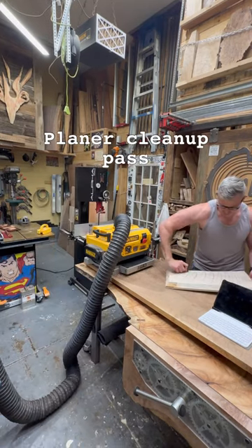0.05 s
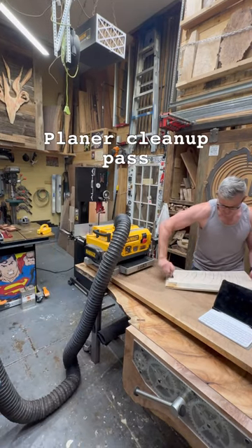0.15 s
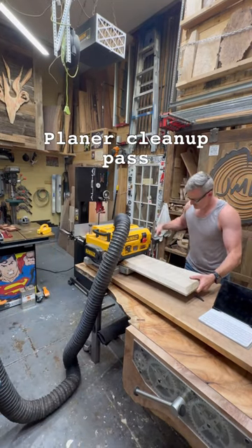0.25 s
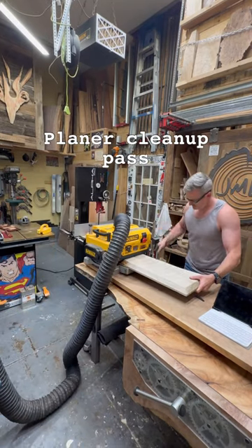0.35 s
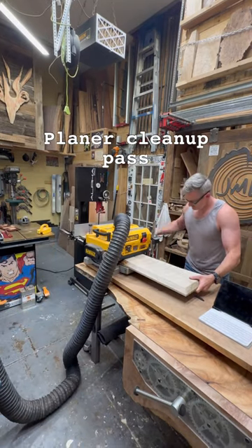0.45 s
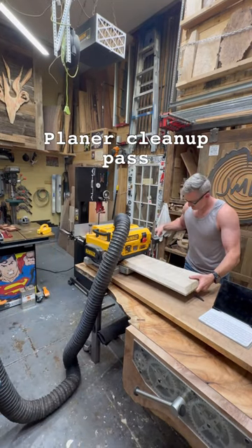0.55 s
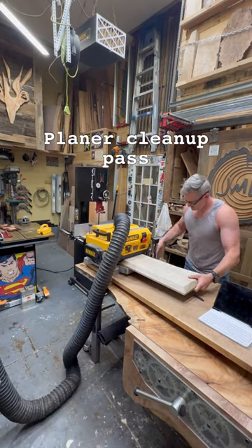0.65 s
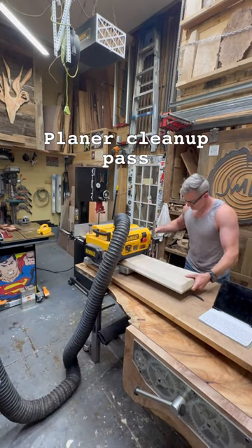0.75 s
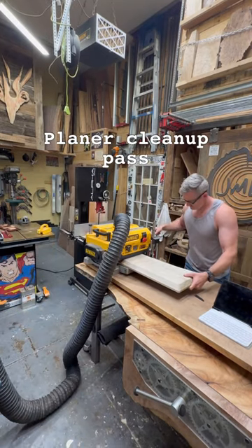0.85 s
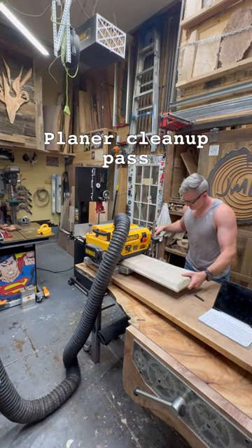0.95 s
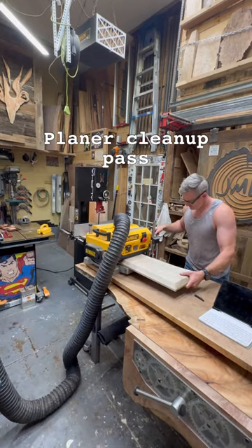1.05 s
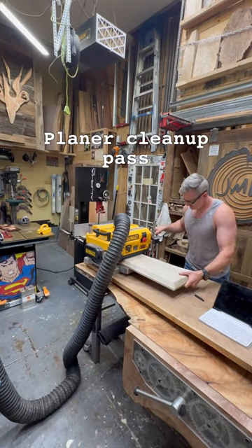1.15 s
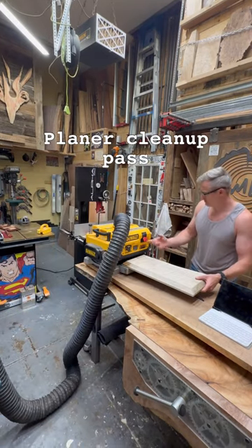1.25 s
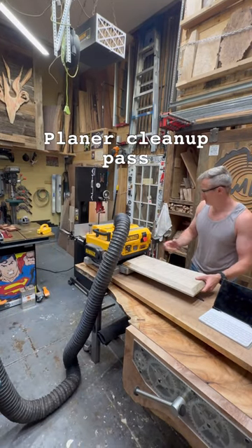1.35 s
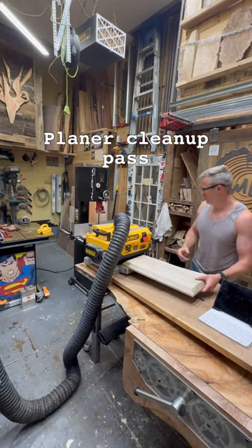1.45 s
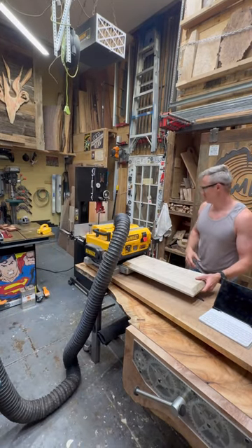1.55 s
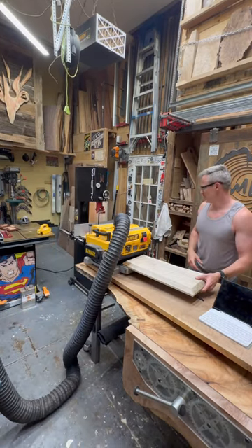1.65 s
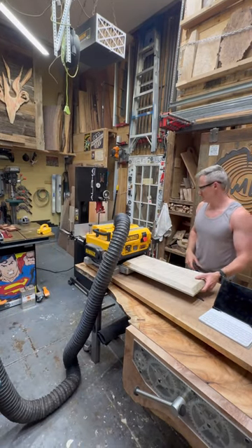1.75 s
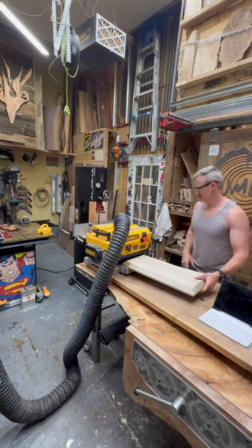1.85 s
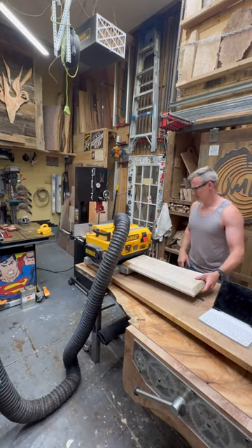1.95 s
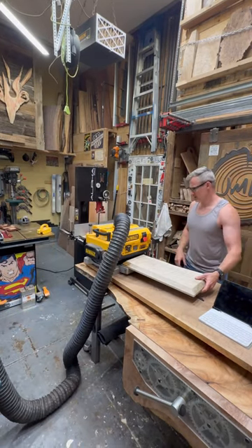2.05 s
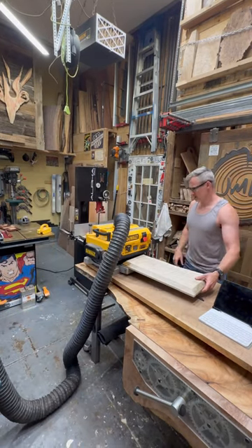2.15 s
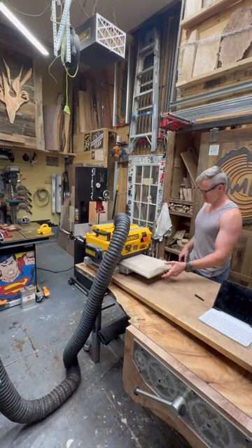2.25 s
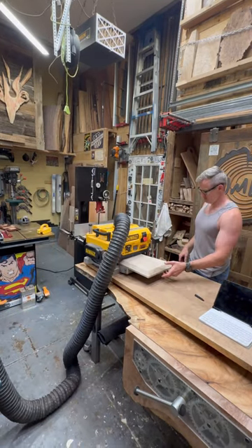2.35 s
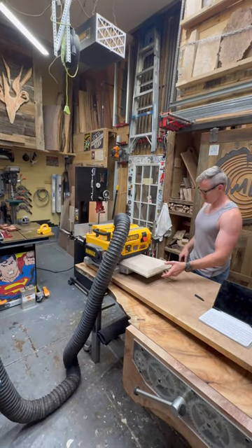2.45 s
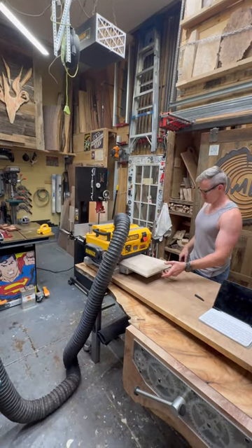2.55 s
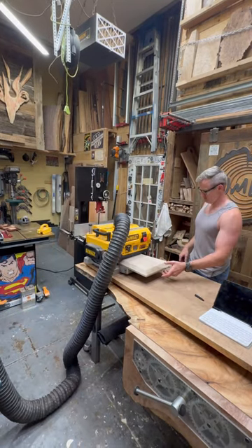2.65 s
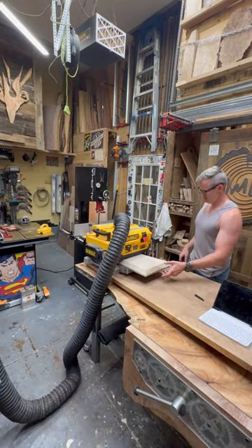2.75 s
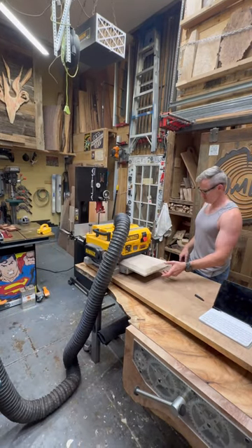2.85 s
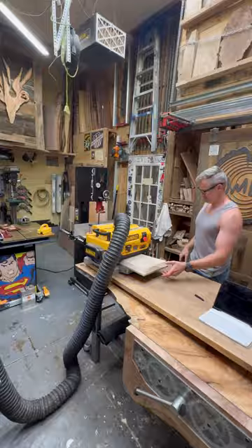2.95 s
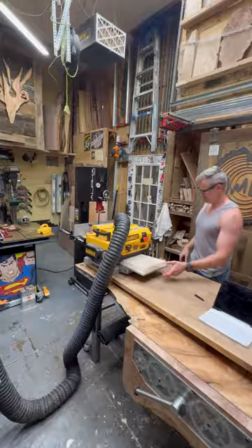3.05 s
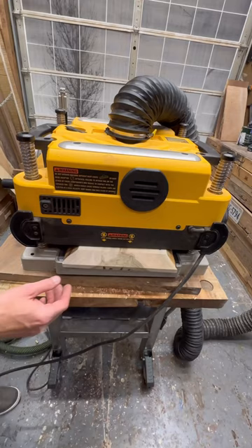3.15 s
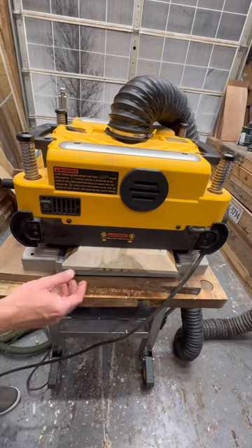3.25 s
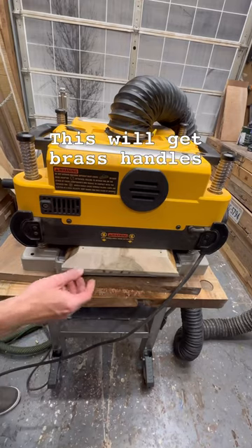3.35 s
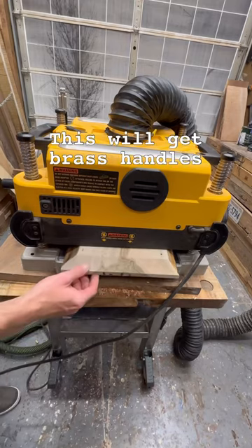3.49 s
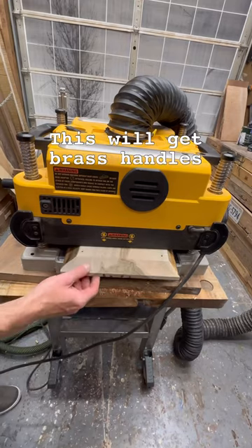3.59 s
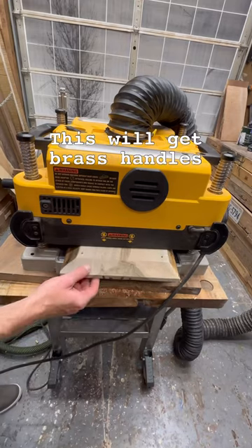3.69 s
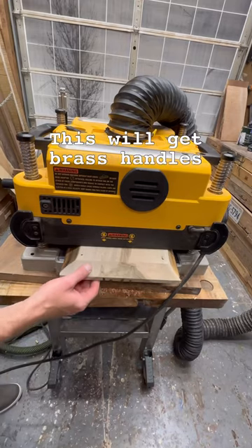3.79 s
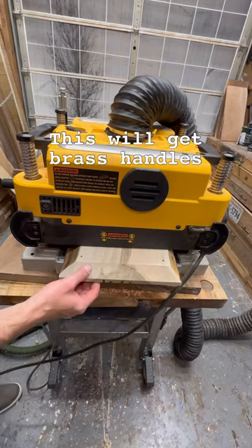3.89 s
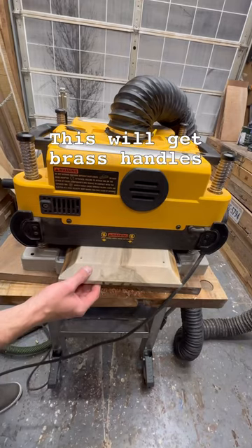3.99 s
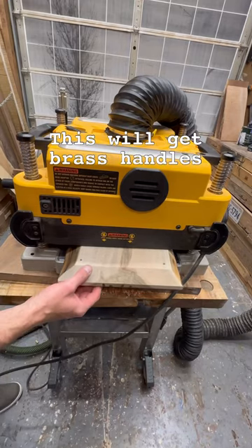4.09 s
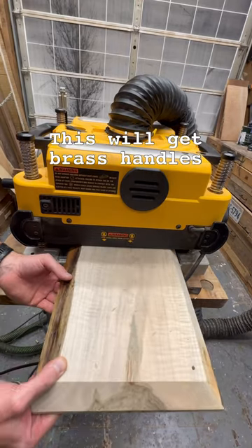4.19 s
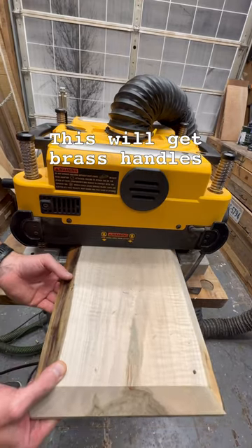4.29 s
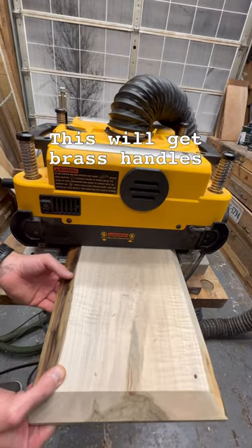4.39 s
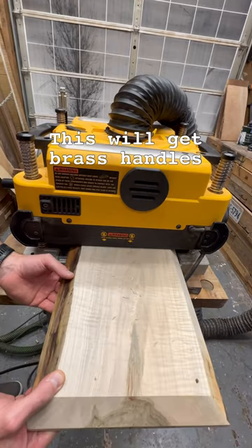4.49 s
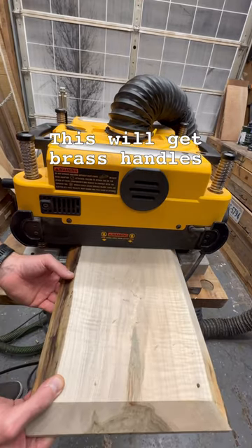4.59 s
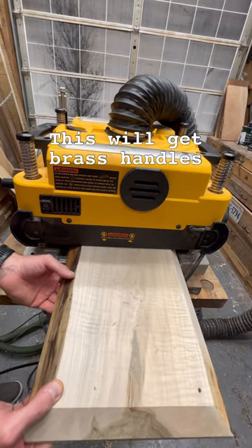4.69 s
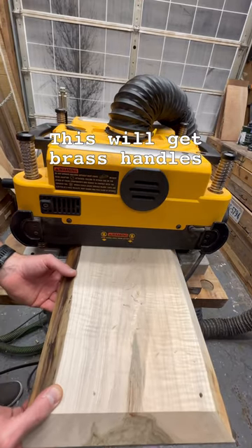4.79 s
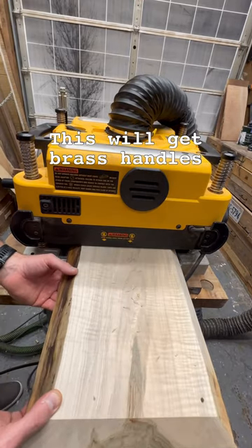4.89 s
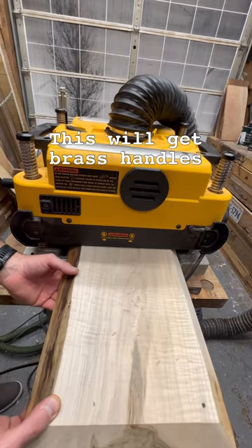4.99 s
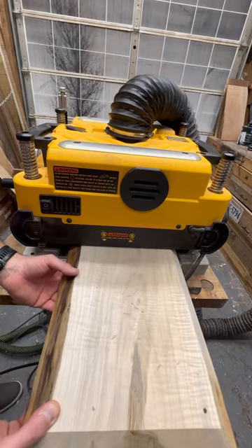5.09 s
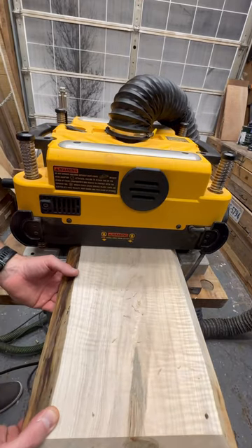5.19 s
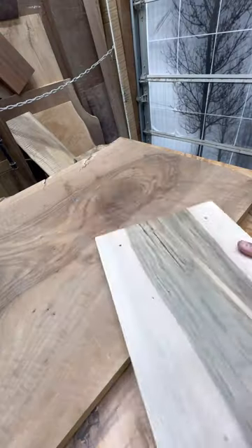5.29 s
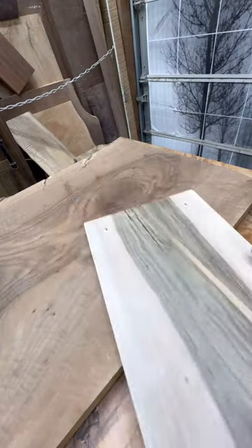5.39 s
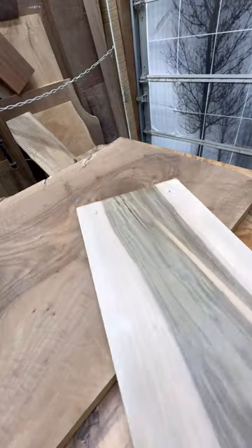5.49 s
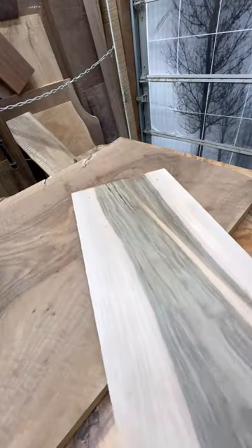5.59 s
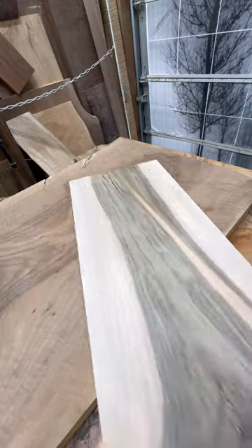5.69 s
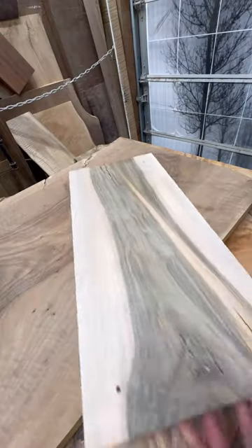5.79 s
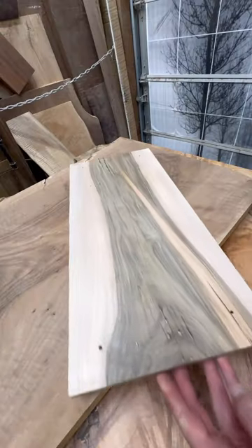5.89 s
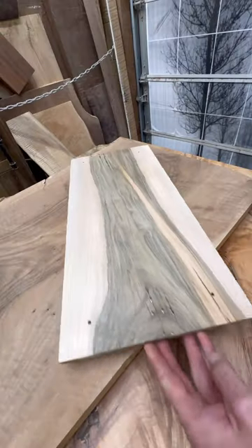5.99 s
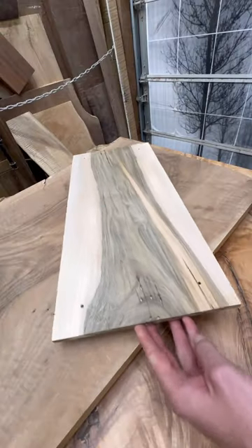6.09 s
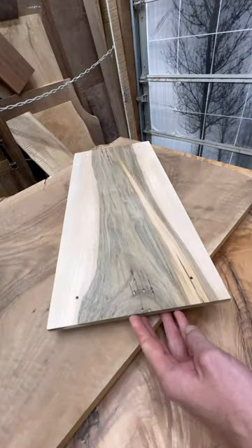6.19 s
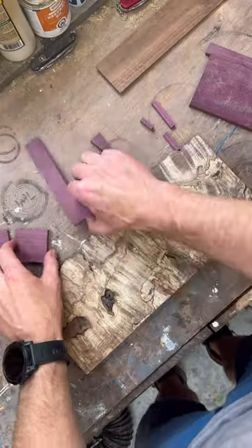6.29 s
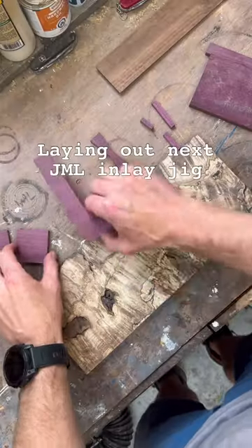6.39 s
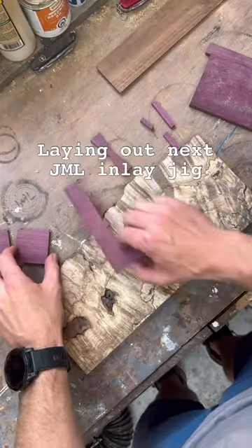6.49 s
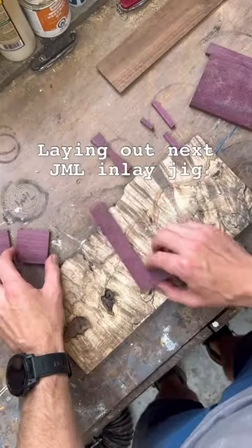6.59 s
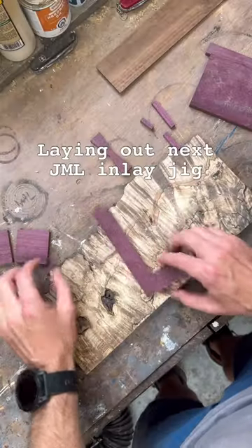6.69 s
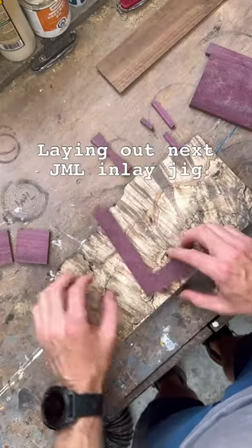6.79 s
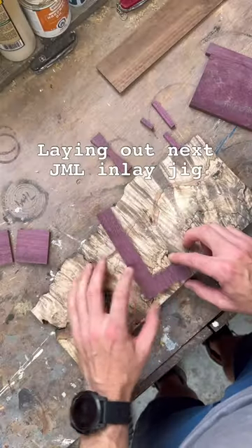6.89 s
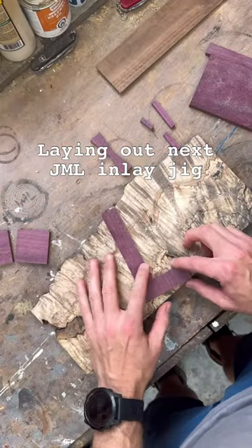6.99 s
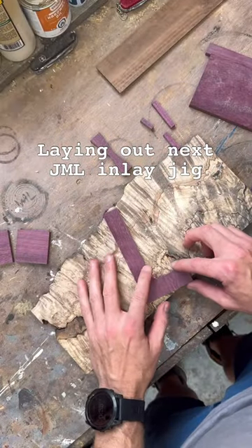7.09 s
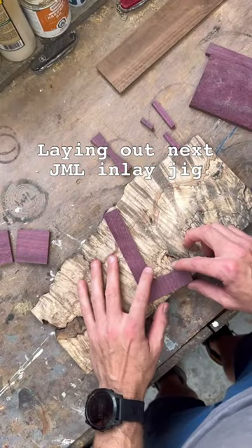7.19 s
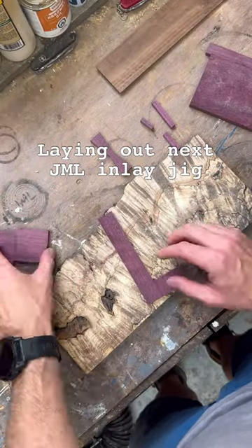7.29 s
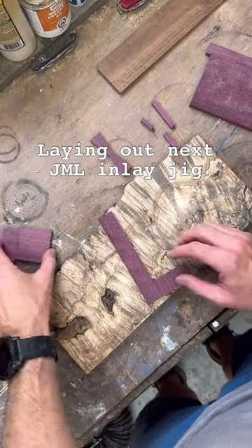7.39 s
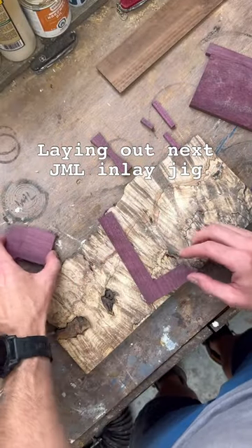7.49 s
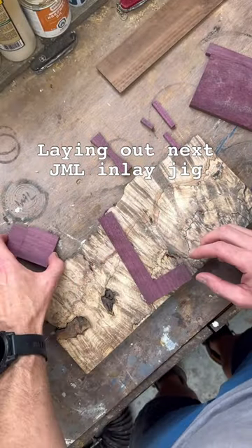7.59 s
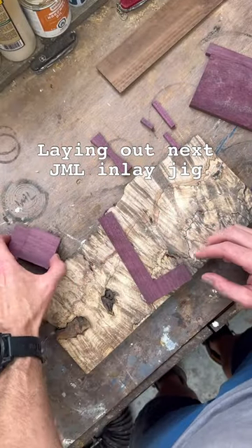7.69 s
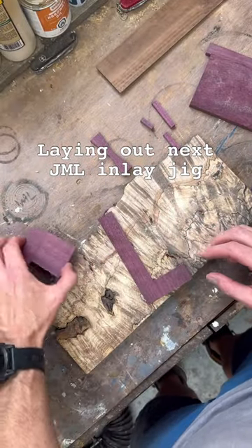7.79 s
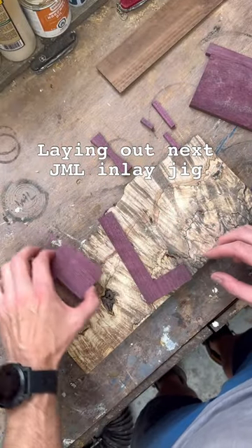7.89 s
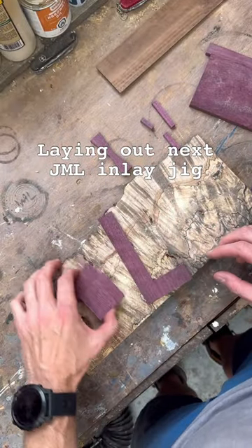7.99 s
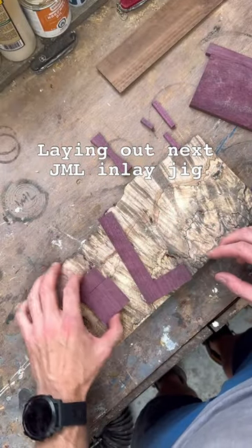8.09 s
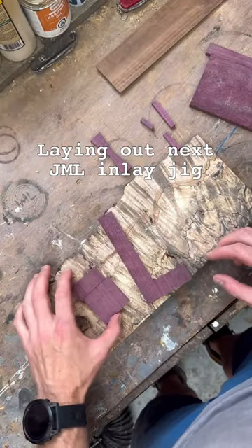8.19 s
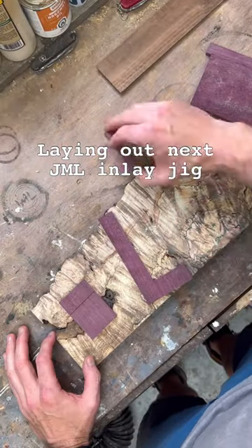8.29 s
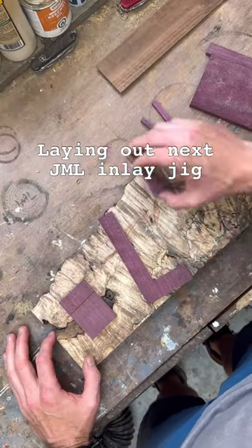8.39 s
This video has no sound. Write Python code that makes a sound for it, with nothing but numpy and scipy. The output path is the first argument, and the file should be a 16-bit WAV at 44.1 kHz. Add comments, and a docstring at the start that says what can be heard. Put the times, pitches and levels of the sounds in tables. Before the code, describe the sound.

A dust collector drones, a wood planer whines up and planes loudly, then a board knocks down and small wooden pieces tap quietly.

```python
"""A garage workshop, in stereo and in quick cuts. A dust collector drones on its fan blades. A benchtop
planer is switched on, spins up and takes a board, its tones riding on the motor speed over rushing noise:
the microphone is first across the shop, then close up. The board is dropped and slid over a slab. Last,
in the quiet, small hardwood pieces are shuffled and set down on a bench. Every blow rings the modes of
the thing struck, and the garage answers."""
import sys
import numpy as np
from scipy import signal
from scipy.io import wavfile
from scipy.ndimage import uniform_filter1d

SR = 44100
rng = np.random.default_rng(int(sys.argv[2]) if len(sys.argv) > 2 else 0)


def unload_wav(signal):
    """Save mono or channel-first audio to the path in sys.argv[1] as 16-bit WAV at rate SR, clipped to [-1, 1]."""
    wavfile.write(
        sys.argv[1],
        SR,
        np.round(np.clip(np.atleast_2d(signal).T, -1, 1) * 32767).astype(np.int16),
    )


N = 372644

# Planer, one entry a stage: spin-up and cut from across the shop, then cut and outfeed close up.
# motor speed: (t/s, f/Hz)
MOTOR_SPEED = [
    [(1.3, 95.15), (1.41, 166.3), (1.5, 215.2), (1.6, 248), (1.72, 264.9), (1.9, 285.4), (2.05, 294.3),
     (2.238, 302.2)],
    [(2.242, 276.5), (2.42, 284.9), (2.55, 293.9), (2.7, 297.5), (2.95, 297.5), (3.187, 292)],
    [(3.19, 296.9), (3.7, 296.5), (4.185, 295.5)],
    [(4.19, 293), (4.42, 295.6), (4.6, 301.2), (4.85, 303.6), (5.236, 305.5)],
]
# tone families under speed and load: (t/s, motor/dB, cutter/dB, whine/dB, whistle/dB)
FAMILY_LEVELS = [
    [(1.3, -57.5, -23, -73, -44), (1.405, -43, -38, -56, -42.5), (1.467, -31, -44, -40, -32),
     (1.55, -36, -36, -41, -34), (1.72, -26, -26, -37, -40), (2.238, -21, -28.5, -42, -57.5)],
    [(2.242, -32, -35, -48, -59), (2.44, -24.5, -25, -48, -54), (2.52, -27, -29.5, -36, -54),
     (2.57, -27, -33, -43, -54), (2.67, -28, -24, -35.5, -59), (2.99, -26.5, -25.5, -41.5, -59),
     (3.187, -32, -32, -37, -57)],
    [(3.19, -49.5, -44, -44, -40), (3.95, -45, -45, -43, -40.5), (4.185, -45.5, -44.5, -64, -41)],
    [(4.19, -39, -41.5, -36, -38.5), (4.45, -42.5, -44, -37.5, -35.5), (4.6, -38.5, -44, -34.5, -42),
     (4.8, -38.5, -45, -30, -41), (5.236, -39, -43, -30.5, -51)],
]
# the tones rasp as the motor climbs, then steady: (waver/dB, jitter/share of speed)
RASP = [(4.2, .0085), (2.0, .001), (1.5, .0006), (1.5, .0008)]
# motor, cutter drive, fan whine, high whistle: (multiple of motor speed, level/dB re family)
FAR_FAMILIES = [(1, 0), (1.475, -10), (2, -9)], [(2.32, -12), (2.522, 0), (2.74, -13), (3.36, -14),
                (3.79, -17), (4.01, -18), (4.43, -18), (5.28, -19), (5.5, -19)], [(7.62, 0), (8, -1),
                (9.61, -7), (13.69, -7)], [(16, 0)]
NEAR_FAMILIES = [(1.258, 0), (1.68, -1), (2.29, -1), (2.45, -1), (2.684, -4)], [(2.815, 3), (3.162, -2),
                 (3.361, -2), (4.215, -5), (4.4, -3), (4.924, -3), (5.61, -6), (6.722, 3), (9.12, -6),
                 (9.683, 0.5), (10.665, -7), (13.04, -7), (13.83, -5)], [(8, 0)], [(17.63, 0)]
# cutter head buzz: (turns per motor turn, level/dB re cutter family)
FAR_BUZZ, NEAR_BUZZ = (.504, -25), (0.6, -26)

# stereo width across the shop, close up and at the bench: (f/Hz, side level/dB)
WIDE_FAR = [(60, -26), (200, -27), (380, -11), (700, 3.5), (1300, -6), (2400, -3.5), (4400, -1.5),
            (9000, 1), (15800, -5.5)]
WIDE_NEAR = [(40, 10), (750, -2), (1300, -6), (1800, -29), (3600, -17.5), (5200, -4.5), (10000, 0.5),
             (15800, -8.5)]
WIDE_BENCH = [(40, -28), (300, -1), (1500, -6), (4000, -1), (7000, 1.5), (15800, -3.5)]
# treble notch in the middle of the stereo image: (f/Hz, mid level/dB)
MID_TREBLE = [(10000, 2.5), (11000, -14.5), (11800, -67), (14200, -67.5), (15000, -8.5), (15800, -12)]
# rushing and rubbing noises: curve (t/s, level/dB), colour (f/Hz, level/dB), width
SPIN_UP = [(1.25, -32.5), (1.57, -18.5), (1.986, -15.5), (2.226, -19.5), (2.238, -23.5)], [(60, -26),
           (175, -15.5), (260, 3), (490, -4.5), (700, 2), (900, 1), (1500, -3.5), (3000, -10.5),
           (4000, -7.5), (5000, -16.5), (6500, -10.5), (10000, -19.5)], WIDE_FAR
CUT_FAR = [(2.24, -25), (3.166, -24), (3.187, -24)], [(40, -49), (90, -29.5), (216, -15.5), (300, -9),
           (540, -8), (750, -6.5), (1250, -12), (3000, -17.5), (4000, -16), (5000, -23), (6500, -18),
           (10000, -27)], WIDE_FAR
CUT_NEAR = [(3.189, -28), (4.187, -27.5)], [(25, -28), (53, -5.5), (153, -6.5), (362, -3.5), (813, -1.5),
            (1120, -4), (1700, -2), (2210, -7), (4110, -4.5), (4900, -14), (5600, -9.5), (7500, -11.5),
            (10000, -12.5)], WIDE_NEAR
OUTFEED = [(4.187, -26.5), (4.4, -24.5), (5.236, -24)], [(25, -29), (59, -5), (153, -8.5), (372, 0.5),
           (835, -1.5), (1150, -9), (1850, 0), (2390, -7), (4110, -5), (4900, -14), (5600, -8.5),
           (7500, -12), (10000, -12)], WIDE_NEAR
BOARD_SLIDE = [(5.237, -39), (5.36, -40.5), (5.5, -41.5), (5.53, -38.5), (5.65, -39.5), (6.14, -48),
               (6.223, -53.5), (6.25, -64)], [(30, -12), (75, 0), (153, -18), (300, -6.5), (550, -3.5),
               (1300, -5.5), (2010, -9), (2100, 0), (2200, -12.5), (3300, -14), (4990, -25), (6600, -21),
               (10000, -28)], WIDE_BENCH
SHOP_AIR = [(0, -34), (2.238, -35), (2.242, -45), (3.187, -40)], [(25, -17), (60, 0), (235, 4), (500, 2),
            (900, -6), (1500, -15.5), (3000, -21.5), (4000, -16), (5000, -24.5), (7000, -23),
            (10000, -31.5)], WIDE_FAR
ROOM_TONE = [(6.2, -60.5), (8.45, -65)], [(30, -3.5), (64, 4.5), (169, -14), (435, -20), (1420, -19),
             (2520, -25), (3840, -21.5), (5120, -32), (7020, -23), (9130, -39.5), (13500, -48)], WIDE_BENCH
# the casing shakes as the motor gathers speed: (level/dB, hold/s, fade/s, fade/dB), colour, width
CASING_GROWL = (-22, 0.48, 0.5, -13.5), [(350, -40.5), (480, 5.5), (540, -7.5), (600, -5.5), (680, 3),
                (760, -4), (860, -8), (1100, -59.5)], WIDE_FAR
# board on the feed table, pieces on the bench: strokes (t/s, level/dB, fade/s), colour, width
FEED_SCRAPES = [(0.772, -45, 0.03), (0.795, -45, 0.058)], [(2000, -18), (3500, -4), (6000, -2), (8000, -3),
                (10500, -6)], WIDE_FAR
HARDWOOD_PIECE_SCUFFS = [(6.275, -58.5, 0.14), (6.865, -52.5, 0.083), (6.96, -55.5, 0.12),
                         (7.2, -60, 0.068)], [(150, -22), (350, 5), (500, 2), (700, -8), (1500, -17),
                         (9000, -39)], WIDE_BENCH
# the bench leaned on: crests (t/s, level/dB), colour, width
BENCH_RUMBLE = [(6.33, -48), (6.37, -45), (6.6, -40), (6.96, -54), (7.04, -49), (7.24, -46), (8.05, -45),
                (8.11, -46)], [(25, -24.5), (60, -12.5), (130, 6.5), (250, -10), (400, -36.5),
                (900, -71.5)], WIDE_BENCH

# blows: (t/s, peak level/dB, left minus right/dB, softness/ms)
SWITCH_CLICKS = [(1.2465, -13, 0.89, 0.021), (1.26, -11, 0.8, 0.33)]
BOARD_DROP = [(5.237, -16, 4, 0.055), (5.241, -8.5, -4, 0.15), (5.249, -12, -5, 0.3),
              (5.263, -13.5, 9.5, 0.13), (5.295, -23, -2, 0.13)]
STRIP_TAPS = [(6.277, -43, -12, 0.015), (6.575, -11.5, -14.5, 0.009), (6.5776, -17.5, 6, 0.044),
              (6.5828, -12.5, 3, 0.13), (6.6098, -19, 12, 0.022), (6.6382, -18, -12, 0.022)]
STEEL_CLINKS = [(7.2775, -14.5, -15.5, 0.0063), (7.2868, -17, 8, 0.01), (7.3034, -26, -9, 0.012)]
BLOCK_TAPS = [(8.0085, -18, -10.5, 0.016), (8.0148, -25.5, 6, 0.013), (8.117, -34, -4, 0.26)]
HAND_BUMPS = [(6.31, -43, -6, .6), (6.36, -44, 0, 0.62), (7.025, -44, -4, 0.59), (7.21, -41, -7, 0.8),
              (7.23, -37, -7, 0.7), (7.254, -38, -6, 1.1), (8.035, -37.5, -4, 0.42), (8.131, -32, -4, 0.55)]
SHOP_KNOCKS = [(0.017, -28, -4, 0.033), (0.144, -23, -1, 0.05), (0.156, -22.5, 1, 0.12),
               (0.21, -28.5, -1, 0.056), (0.49, -23.5, -4, 0.17), (0.779, -28, -4, 0.13)]
SHOP_TICKS = [(0.246, -29, 0, 0.01), (1.208, -33.5, 0, 0.0088)]
# modes of the things struck: (f/Hz, level/dB, t60/s)
CASING_MODES = [(242.5, -10, 0.16), (896, -14.5, .01), (1830, -13.5, 0.014), (2730, -13, 0.006),
                (3290, -13.5, 0.005), (6040, -14.5, 0.004)]
BOARD_MODES = [(151, -14, 0.34), (210, -11, 0.04), (377, 11.5, 0.026), (748, 11, 0.012), (873, 2, 0.067),
               (1330, 5, 0.018)]
STRIP_MODES = [(162, -13.5, 0.31), (312, -9, 0.17), (493, 2.5, 0.045), (843, 0, 0.038), (1310, 5, 0.0079),
               (1765, 4, 0.019), (2300, 3.5, 0.01), (3050, -0.5, 0.015), (3930, -1, 0.0052),
               (5250, -6, 0.017), (7000, -7.5, 0.0046), (11400, -30, .004)]
STEEL_MODES = [(294, -24, 0.035), (706, -20, 0.011), (1440, -17, 0.0046), (2620, -12, 0.0036),
               (4180, -9.5, 0.0071), (5230, -13, 0.0079), (6670, -3, 0.029), (8740, -9, 0.0066),
               (10460, -16, 0.0052), (12550, -6.5, 0.0085)]
BLOCK_MODES = [(520, -7.5, 0.059), (900, 1.5, 0.024), (1700, 10, 0.0042), (2440, 5.5, 0.012),
               (3300, 7, 0.005), (4400, 1, 0.0091), (5600, 3.5, 0.0023)]
BENCH_MODES = [(74, -10, 0.22), (134, 0.5, 0.14), (185, -20, 0.062), (253, -4, 0.091)]
SHOP_WOOD_MODES = [(1040, 1.5, 0.048), (1440, 0, 0.072), (1830, -2.5, 0.022), (2165, -8, 0.075),
                   (2580, -7, 0.025)]
TICK_MODES = [(2600, -2.5, .006), (4000, -2, .006), (6100, -3, .005), (8500, -4.5, .004), (12500, -4, .003)]

# the dust collector's blade tone: (t/s, level/dB)
BLADE_LEVEL = [(0.0, -22.5), (1.5, -22.5), (1.56, -17.5), (2.2, -27.5), (2.28, -31), (3.19, -31.5)]
# its shaft orders: (multiple of shaft speed, level/dB re blade tone)
BLOWER_ORDERS = [(1, -11), (2, -15), (3, -21), (5, -24), (6, 0), (8, -21), (9, -20), (12, -14), (18, -20.5)]
# reverberation of the garage: (f/Hz, t60/s)
GARAGE_DECAY = [(100, 0.7), (500, 0.4), (2000, 0.32), (6000, 0.4), (12000, 0.19)]


def planer_tones():
    """Four tone families and the cutter head's buzz ride on the motor speed, which sags under load."""
    out = np.zeros((2, N))
    positions = [(FAR_FAMILIES, FAR_BUZZ, .9)] * 2 + [(NEAR_FAMILIES, NEAR_BUZZ, .35)] * 2
    for speed, levels, position, rasp in zip(MOTOR_SPEED, FAMILY_LEVELS, positions, RASP):
        families, (head_ratio, buzz_db), spread_rad = position
        start, speed_hz = sample_curve(speed)
        t = start + np.arange(len(speed_hz)) / SR
        times, *levels_db = zip(*levels)
        gains = [gain_of(np.interp(t, times, db)) for db in levels_db]
        sound = sum(gain * shaft_tones(speed_hz, orders, *rasp, spread_rad)
                    for gain, orders in zip(gains, families))
        buzz_orders = [(k, buzz_db) for k in range(7, 21)]
        sound += gains[1] * shaft_tones(head_ratio * speed_hz, buzz_orders, 4.2, .0007, spread_rad)
        add(out, start, sound * edge_fades(len(t), 100))
    return out


def planer_rush():
    """The planer rushes as it spins up and cuts; its casing growls while the motor gathers speed."""
    growl, colour, width = CASING_GROWL
    casing = rush(stroke(1.329, .008, *growl), colour, width, patchy_db=2)
    return casing + sum(rush(*stage) for stage in (SPIN_UP, CUT_FAR, CUT_NEAR, OUTFEED))


def planer_switch():
    """The switch snaps and rings the casing, across the shop."""
    return blows(SWITCH_CLICKS, CASING_MODES, rattle_db=-12, rattle_s=.016, wet_db=-10.5)


def board():
    """The board scrapes onto the feed table; once planed, it is dropped and slid over the slab."""
    out = blows(BOARD_DROP, BOARD_MODES, rattle_db=-81, rattle_s=.03, wet_db=-8)
    scrapes, colour, width = FEED_SCRAPES
    for start, db, fade_s in scrapes:
        out += rush(stroke(start, .0066, db, 0, fade_s, -12), colour, width, patchy_db=0)
    return out + rush(*BOARD_SLIDE, patchy_db=1.5)


def small_pieces(fade_db_per_s=-46):
    """Fingers push pieces over the bench; a hardwood strip and a block are set down, and steel clinks."""
    out = blows(STRIP_TAPS, STRIP_MODES, rattle_db=-24, rattle_s=.014, wet_db=-8)
    out += blows(STEEL_CLINKS, STEEL_MODES, rattle_db=-12, rattle_s=.025, wet_db=-6)
    out += blows(BLOCK_TAPS, BLOCK_MODES, rattle_db=-13.5, rattle_s=.053, wet_db=-6)
    scuffs, colour, width = HARDWOOD_PIECE_SCUFFS
    for start, db, fade_s in scuffs:
        scuff = stroke(start, .022, db, 0, fade_s, fade_db_per_s * fade_s)
        out += rush(scuff, colour, width, patchy_db=3.5)
    return out


def bench(swell_s=.057, die_s=.12, range_db=16):
    """The bench top rings low when hands bump it and rumbles when leaned on."""
    out = blows(HAND_BUMPS, BENCH_MODES, rattle_db=-41.5, rattle_s=.034, wet_db=-15.5)
    crests, colour, width = BENCH_RUMBLE
    for crest, db in crests:
        swell = [(crest - swell_s, db - range_db), (crest, db), (crest + die_s, db - range_db)]
        out += rush(swell, colour, width, patchy_db=5, pan_db=-3)
    return out


def shop_clatter():
    """Wood knocks and small ticks sound around the shop before the planer starts."""
    knocks = blows(SHOP_KNOCKS, SHOP_WOOD_MODES, rattle_db=-20.5, rattle_s=.066, wet_db=-.65)
    return knocks + blows(SHOP_TICKS, TICK_MODES, rattle_db=-25, rattle_s=.0086, wet_db=-15)


def dust_collector(shaft_hz=59.54):
    """A six-bladed blower drones; with the microphone at the planer only its shaft hum is left."""
    out = np.zeros((2, N))
    start, level_db = sample_curve(BLADE_LEVEL)
    speed_hz = np.full(len(level_db), shaft_hz)
    # the deepest tones fill the room evenly
    for orders, pan_db in ((BLOWER_ORDERS[:2], .1), (BLOWER_ORDERS[2:], 1.3)):
        add(out, start, panned(level_db, 2 * pan_db) * shaft_tones(speed_hz, orders, .99, .0015))
    hum = shaft_tones(np.full(round(2.05 * SR), shaft_hz), [(1, -43)], waver_db=2.5, jitter=.004)
    close_up_start = MOTOR_SPEED[2][0][0]
    add(out, close_up_start, hum)
    return out


def ambience():
    """Air rushes across the shop; at the bench there is faint room tone, leaning right."""
    return rush(*SHOP_AIR) + rush(*ROOM_TONE, pan_db=-7)


def garage_response():
    """The walls return sparse echoes of random sign, each band dying at its own speed."""
    echoes = np.zeros((2, SR // 2))
    slots = np.arange(150, SR // 2 - 20, 20)
    arrivals = slots + rng.integers(0, 20, (2, len(slots)))
    np.put_along_axis(echoes, arrivals, rng.choice([-1., 1.], arrivals.shape), axis=1)
    hz, t, spectra = signal.stft(echoes, SR, nperseg=256)
    decay = gain_of(-60 * t / at_frequency(GARAGE_DECAY, hz)[:, None])
    tail = signal.istft(spectra * decay, SR, nperseg=256)[1]
    tail[1] = .6 * tail[0] + .8 * tail[1]  # left and right are partly alike
    return tail / np.linalg.norm(tail[0])


def shaft_tones(speed_hz, orders, waver_db, jitter, spread_rad=.9):
    """Wavering sines on multiples of a shaft speed; high ones differ more in phase from left to right."""
    n = len(speed_hz)
    out = np.zeros((2, n))
    for order, db in orders:
        turns = np.cumsum(speed_hz * (1 + jitter * wander(n, 25))) / SR
        phase = 2 * np.pi * (order * turns + rng.random())
        apart = min(order * speed_hz[-1] / 1500, spread_rad) * np.array([[.5], [-.5]])
        out += np.sqrt(2) * gain_of(db + waver_db * wander(n, 4.5)) * np.sin(phase + apart)
    return out


def rush(curve, colour, width, patchy_db=.8, pan_db=0, streak_db=3.5):
    """Coloured mid and side noise, its spectrum drifting in patches, follows a level curve."""
    start, level_db = sample_curve(curve)
    n, hz = len(level_db), np.fft.rfftfreq(1024, 1 / SR)
    mid_re, mid_im, side_re, side_im, patches, streaks = rng.standard_normal((n // 256 + 5, 513, 6)).T
    streaks = unit_rms(uniform_filter1d(streaks, 140, axis=1))  # the walls favour some pitches
    patches = unit_rms(uniform_filter1d(uniform_filter1d(patches, 8, axis=0), 8, axis=1))
    colour_db = at_frequency(colour, hz) + [at_frequency(MID_TREBLE, hz), at_frequency(width, hz)]
    spectra = np.array([mid_re + 1j * mid_im, side_re + 1j * side_im])
    spectra *= gain_of(colour_db[:, :, None] + patchy_db * patches + streak_db * streaks)
    mid, side = signal.istft(spectra, nperseg=1024, noverlap=768)[1][:, 256:n + 256]
    stereo = np.array([mid + side, mid - side]) / mid.std()
    out = np.zeros((2, N))
    add(out, start, stereo * panned(level_db, pan_db) * edge_fades(n, 40))
    return out


def blows(events, modes, rattle_db, rattle_s, wet_db):
    """A push and a short contact rattle ring the modes, never twice alike; the garage answers."""
    out, t = np.zeros((2, N)), np.arange(SR // 4) / SR
    for start, db, pan_db, soft_ms in events:
        ring = np.zeros(len(t))
        for k, (hz, mode_db, t60) in enumerate(modes):
            stray_db, detune = rng.normal(0, (2.6, .012))
            decay = gain_of(mode_db + stray_db - 60 * t / t60)
            # neighbouring modes move in opposite sense at the point struck
            ring += (-1) ** k * decay * np.sin(2 * np.pi * hz * (1 + detune) * t)
        contact = gain_of(rattle_db - 60 * t[:2000] / rattle_s) * rng.standard_normal(2000)
        contact[0] = 1
        push = t[1:200] * np.exp(-t[1:200] * 1000 / soft_ms)  # a softer blow is longer and duller
        ring = signal.fftconvolve(signal.fftconvolve(ring, contact), push)
        direct = panned(db, pan_db) * ring / abs(ring).max()
        add(out, start, direct)
        # the walls blend the modes into one broad crack
        crack = direct[:, :2000] * gain_of(-60 * t[:2000] / .012)
        crack -= uniform_filter1d(crack, size=300)  # a small piece radiates no deep bass
        crack *= np.linalg.norm(direct) / np.linalg.norm(crack)
        add(out, start, gain_of(wet_db) * signal.fftconvolve(crack, garage_response(), axes=1))
    return out


def stroke(start, attack_s, db, hold_s, fade_s, fade_db):
    """Attack, hold and fade as a curve of (t/s, level/dB)."""
    top = start + attack_s
    return [(start, db - 30), (top, db), (top + hold_s, db), (top + hold_s + fade_s, db + fade_db)]


def wander(n, hz):
    """Slow random drift of rms 1."""
    noise = uniform_filter1d(rng.standard_normal(n), 200)
    return unit_rms(signal.lfilter([1], [1, -np.exp(-2 * np.pi * hz / SR)], noise))


def sample_curve(points):
    """A curve's start time and its value at every sample."""
    times, values = np.transpose(points)
    return times[0], np.interp(np.arange(times[0], times[-1], 1 / SR), times, values)


def at_frequency(points, hz):
    """Reads a table on a log-frequency axis."""
    f, values = np.transpose(points)
    return np.interp(np.log(hz + 1), np.log(f + 1), values)


def edge_fades(n, samples):
    """A short ramp in and out."""
    rise = np.minimum(np.arange(n) / samples, 1)
    return np.minimum(rise, rise[::-1])


def panned(db, pan_db):
    """Left and right gains, pan_db apart."""
    return gain_of(db + np.array([[pan_db], [-pan_db]]) / 2)


def gain_of(db):
    """Decibels to gain."""
    return 10 ** (np.asarray(db) / 20)


def unit_rms(x):
    """Scales to rms 1."""
    return x / np.sqrt(np.mean(x ** 2) + 1e-20)


def add(mix, start_s, sound):
    """Mixes a stereo sound in."""
    part = mix[:, round(start_s * SR):][:, :sound.shape[1]]
    part += sound[:, :part.shape[1]]


def scene():
    """The planer in front, then the handled wood, with the shop behind."""
    planer = planer_tones() + planer_rush() + planer_switch()
    return planer + board() + small_pieces() + bench() + shop_clatter() + dust_collector() + ambience()


def record(dry):
    """The microphone loses the deepest bass and rounds off the highest peaks; the top treble is cut."""
    heard = signal.sosfilt(signal.butter(2, 38., "high", fs=SR, output="sos"), dry)
    heard = np.tanh(heard / 1.3) * 1.3
    lowpass = signal.firwin(511, 15950, window=("kaiser", 9), fs=SR)
    return signal.oaconvolve(heard, lowpass[None], "same")


dry = scene()
out = record(dry)
unload_wav(out)
```